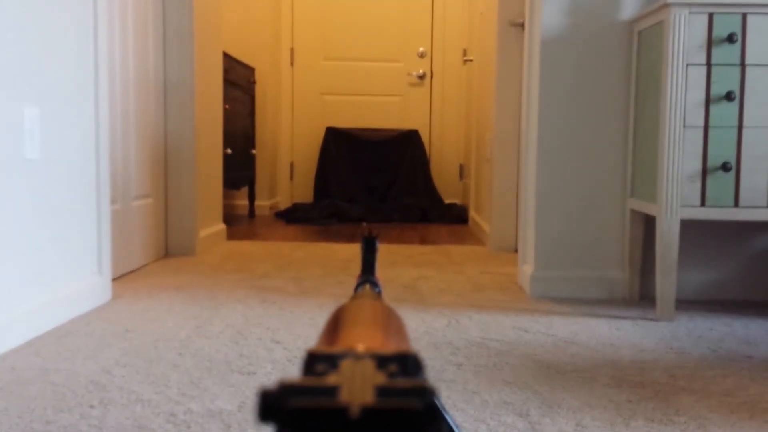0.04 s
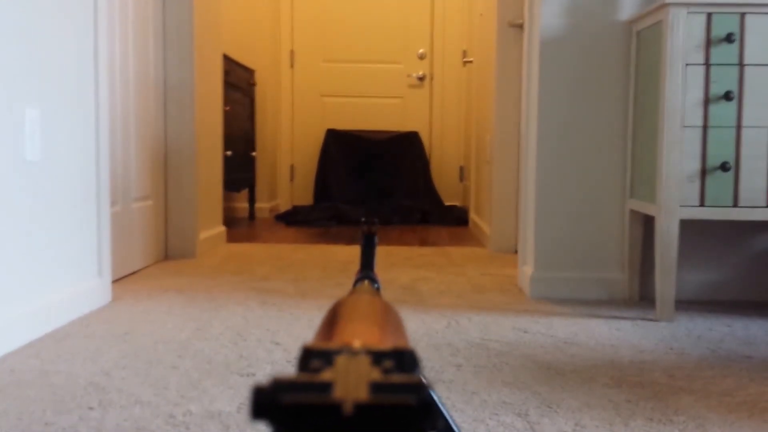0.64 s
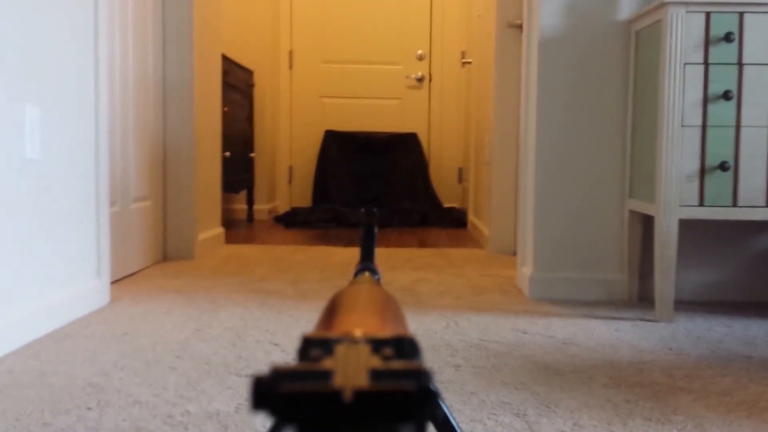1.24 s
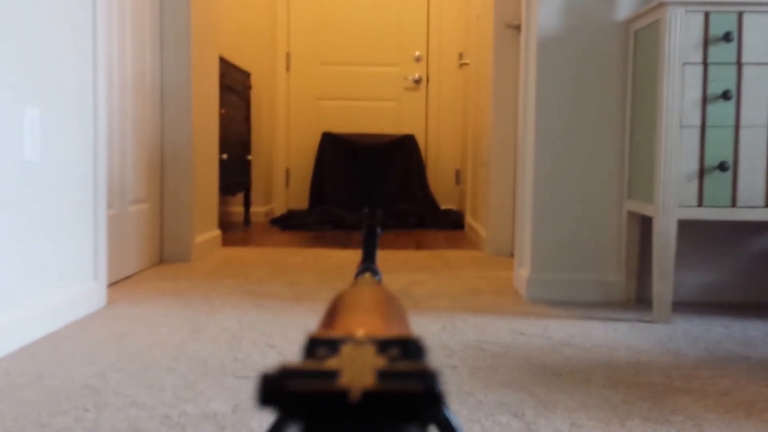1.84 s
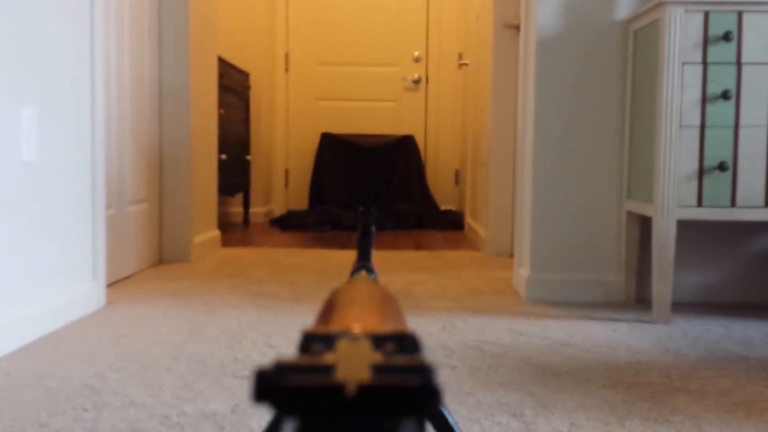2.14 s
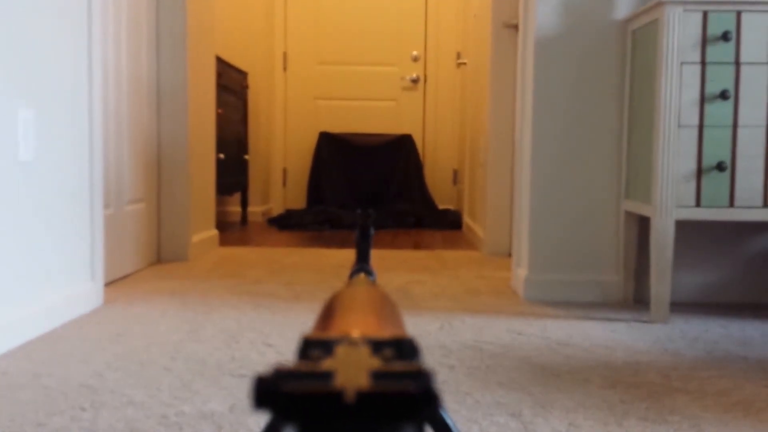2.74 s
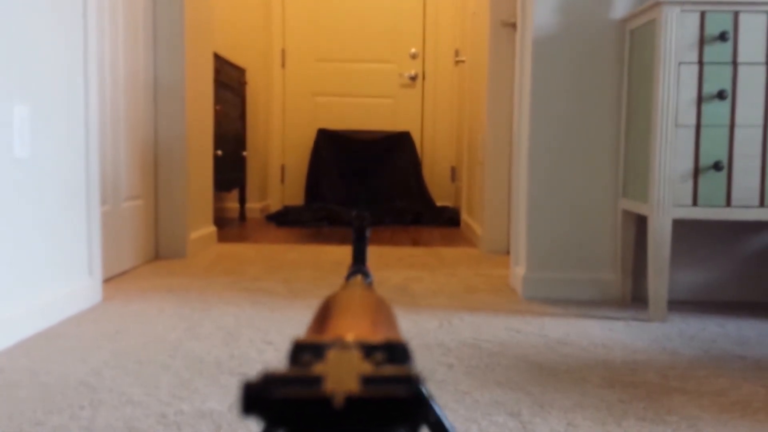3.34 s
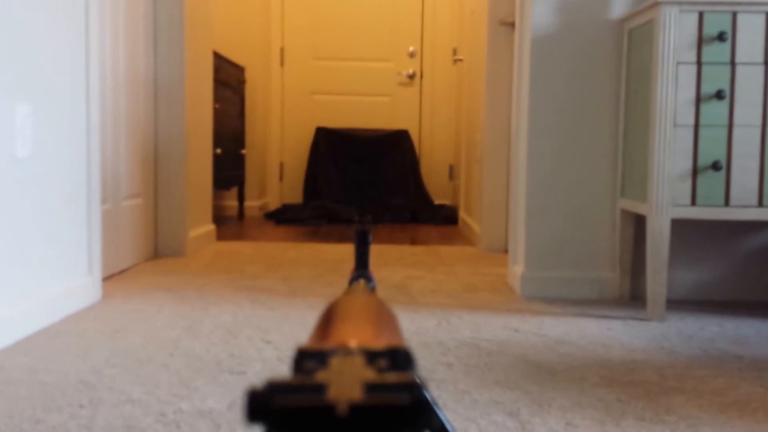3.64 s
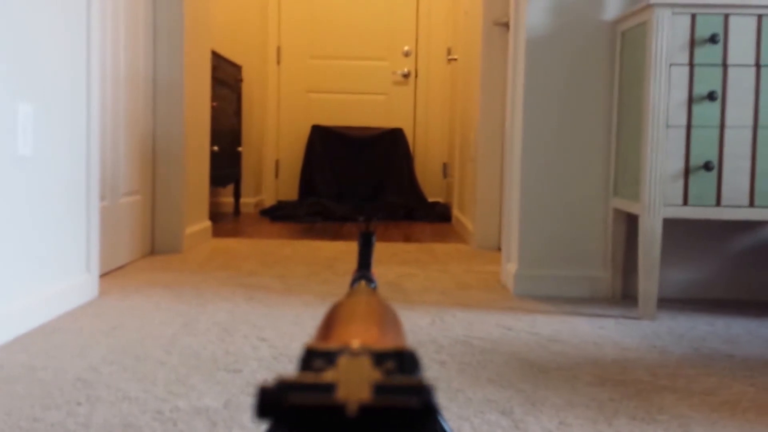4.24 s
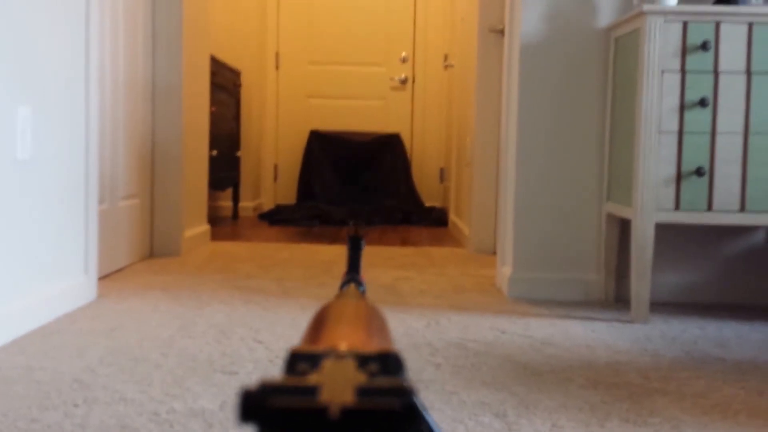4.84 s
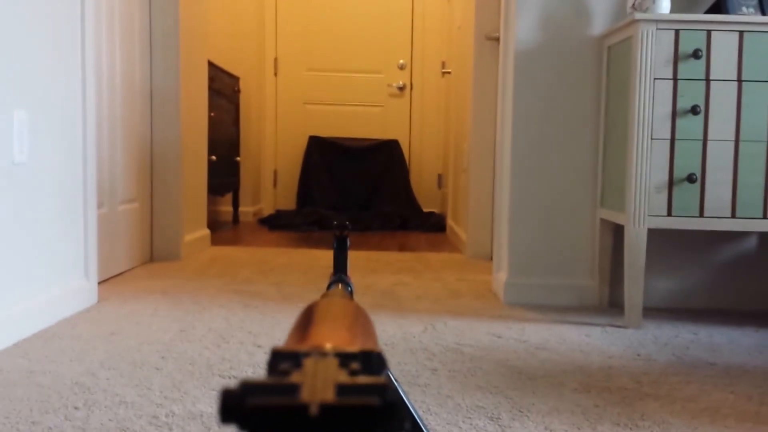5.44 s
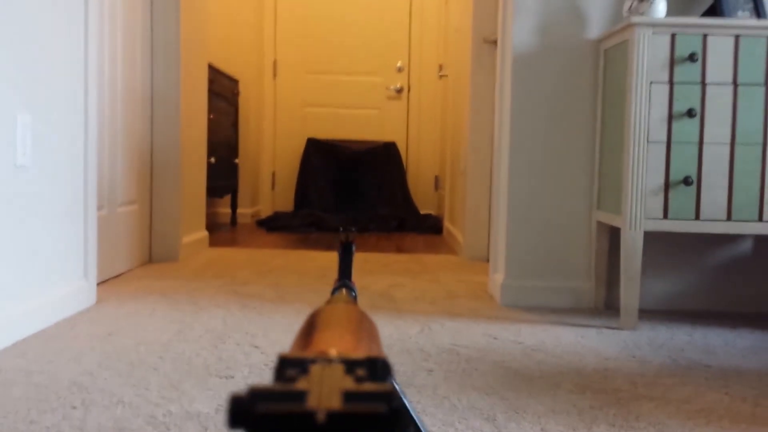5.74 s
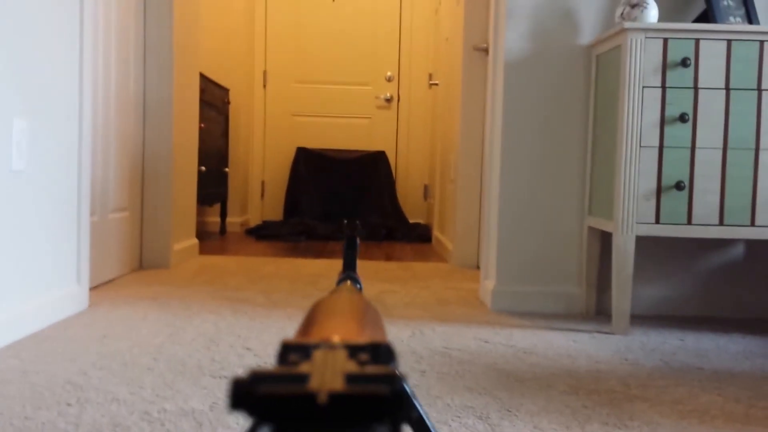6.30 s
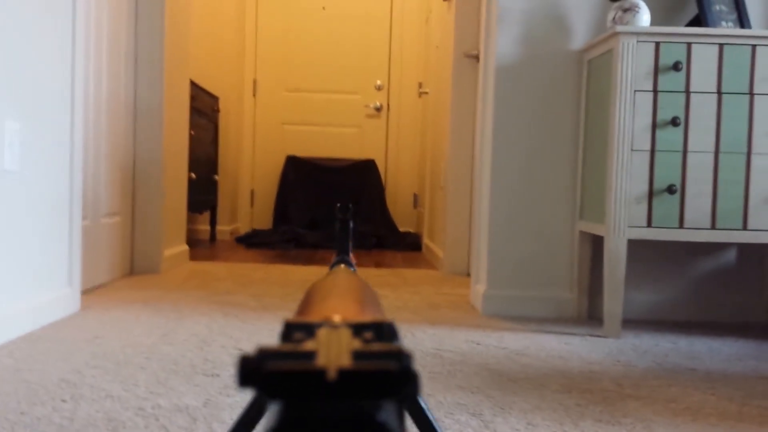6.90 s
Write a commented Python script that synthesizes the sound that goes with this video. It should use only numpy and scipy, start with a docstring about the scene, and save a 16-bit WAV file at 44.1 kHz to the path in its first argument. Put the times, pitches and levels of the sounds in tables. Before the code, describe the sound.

An electric airsoft rifle fires five automatic bursts close to the microphone in a quiet, carpeted hallway. Each begins with a quick rising motor whine, runs as an even rattle of sharp piston slaps, about fourteen a second, with scraping gears and a light thud underneath, then winds down to a small clunk. The first burst lasts from 0.1 to 0.7 seconds, the second from 1.1 to 1.8. A thin plastic tick sounds slightly left at 2.2 seconds. After a faint rub of hands and soft trigger clicks, the longest burst runs from 2.9 to 4 seconds. Two shorter ones follow, from 4.6 to 5.3 and from 5.5 to 6.1 seconds. Faint plastic ticks come at about 6.4 and 7 seconds. The gun sounds fairly dry, with a short hallway echo over very low room tone.

```python
"""An electric airsoft rifle fires five bursts, up close, down a carpeted hallway.
Its motor whines through steel gears, sagging each time it draws the piston back; the piston slips
free, slams into the cylinder head and rocks the gun. The trigger clicks ahead of most bursts, and a
few plastic ticks fall off to the left while the gun rests. Behind it all sit a short hallway echo,
the rub of hands on the stock and quiet room tone."""
import sys
import numpy as np
from scipy import signal
from scipy.fft import rfft, irfft, next_fast_len
from scipy.io import wavfile
from scipy.ndimage import map_coordinates

SR = 44100
rng = np.random.default_rng(int(sys.argv[2]) if len(sys.argv) > 2 else 0)


def digitize_waveform(pressure):
    """Quantize a signal to 16-bit integers and store it at the path in sys.argv[1].

    Rows of a 2-D input are taken as channels; values are limited to [-1, 1].
    """
    field = np.atleast_2d(pressure).T
    bounded = np.clip(field, -1, 1)
    quanta = np.round(bounded * 32767).astype(np.int16)
    wavfile.write(sys.argv[1], SR, quanta)


N = 315823

# Cue sheet, a row per burst: motor start t/s, first slam t/s, shot count, full-speed period/s,
# run-up lag/s, gear stop t/s, first-pull top pitch f/Hz, coast pitch f/Hz, start clunk level/dB
BURSTS = [(.072, .1531, 7, .0710, .0079, .662, 1603, 2380, -16),
          (1.057, 1.1129, 9, .0715, .0119, 1.761, 1200, 1850, -26),
          (2.941, 3.0259, 13, .07157, .0061, 3.957, 1705, 1861, -16),
          (4.636, 4.7233, 8, .07205, .0068, 5.305, 1707, 2259, -21),
          (5.538, 5.6064, 7, .07286, .0095, 6.132, 1380, 3000, -21)]
# First pull of the piston: t/s from motor start, share of top pitch, scrape level/dB, whine level/dB
RUN_UP = [(0, 0.174, -15, -11), (0.008, 0.487, -4, -0.5), (0.024, 0.701, 1.5, -3), (0.036, 0.919, 2, -3),
          (0.058, 0.989, 0, 1), (0.074, .95, -2, -5.5)]
# One turn of the sector gear: share of the turn, nominal pitch f/Hz, scrape level/dB, whine level/dB
GEAR_TURN = [(0, 2703, 1, -28), (.17, 2818, 1, -18), (.21, 2827, 3, -6), (.45, 2713, 2.5, -1),
             (.63, 2552, -0.5, 1.5), (.79, 2328, 1.5, 0.5), (.86, 2236, -5.5, -22.5)]
# Spin-down: share of the time from last shot to stop, scrape level/dB, whine level/dB
COAST = [(.12, -5, -22), (.24, 3.5, -10), (.42, 1.5, -6), (.56, 0, -3), (.7, 1, -4), (.82, -8, -8),
         (.98, -11.5, -17.5)]
# Partials of the whine: multiple of the tooth-mesh pitch, level/dB
WHINE_PARTIALS = [(1, 0.84), (2, -2), (2.35, -10.5), (2.7, -7.5), (3, -3), (4, -5.5)]
WHINE_EQ = [(400, -17), (800, -7.5), (1200, 4), (1620, 5), (2000, -5), (2300, -7.5), (2600, -1.5),
            (2900, -9), (3350, -3), (4200, -4.5), (5450, -2), (6300, 6.5), (7100, 3), (7850, -6.5),
            (8250, -5), (9000, -14), (14000, -21)]  # how well the gun radiates a partial: f/Hz, level/dB
SCRAPE_EQ = [(120, -59), (260, -44.5), (450, -18), (760, -10), (1000, -17), (1400, -4.5), (2000, -10.5),
             (2700, -9.5), (3700, -9), (4700, -8), (5900, -4), (6900, -3), (9000, -10.5), (11500, -17.5),
             (14500, -25)]  # teeth scraping: f/Hz, level/dB

# Hits within a shot: t/s from the slam, crack level/dB, knock level/dB. The rows are release, nozzle,
# air puff, slam, rebound, second rebound, latch, rack pick-up and its bounce.
SHOT_HITS = [(-.0134, -18, -22), (-.0022, -5.5, -11), (-.001, -6.5, -28), (0, -2.5, .3), (.0021, -18, -17),
             (.0062, -16, -21), (.0102, -9.5, -16), (.0146, -10, -11), (.0192, -17, -21)]
HIT_SCATTER = (.0004, 2)  # shot-to-shot spread of the lesser hits: t/s, level/dB
CRACK_EQ = [(150, -48), (400, -27), (1200, -5.5), (2200, -6.5), (4500, -8.5), (7200, 0), (9500, -10),
            (14500, -19.5)]  # bright attack of a hit: f/Hz, level/dB
SHELL_MODES = [(380, -6, 0.011), (778, -3, 0.014), (1020, -3, 0.011), (1310, -2, 0.019),
               (1720, -19.5, .014), (2300, -19.5, 0.0032), (3250, -12.5, 0.012), (4550, -14.5, .007)]  # ring of the gearbox shell: f/Hz, level/dB, t60/s
LATCH_CLUNKS = [(.647, -24), (1.743, -20), (1.754, -15.5), (3.926, -12), (3.947, -14.5), (3.984, -19),
                (3.999, -14.5), (5.292, -20), (5.3, -13.5), (5.33, -14.5), (5.354, -31), (6.119, -14)]  # stopping gears fall back on the latch: t/s, level/dB
RATTLE_EQ = [(200, -36.5), (700, -3.5), (1100, -5), (1350, 2.5), (1700, -1.5), (2200, -10), (4500, -9.5),
             (6800, -6.5), (9500, -17), (14500, -29.5)]  # loose gears: f/Hz, level/dB
THUMPS = [(0.2345, -23.5, 85), (0.394, -27, 84.26), (1.557, -25.5, 84.7), (1.761, -30, 229.1),
          (3.411, -28, 121.6)]  # stray low thumps under the bursts: t/s, level/dB, f/Hz

TRIGGER_CLICKS = [(1.006, -47), (1.02, -45.5), (1.044, -39), (2.877, -45.5), (2.922, -43.5), (4.526, -54.5),
                  (4.62, -44)]  # the finger takes up the trigger: t/s, level/dB
TICKS = [(2.151, -27.5), (2.1655, -25.5), (6.4131, -39.5), (6.458, -40), (6.4672, -36.5), (7.0008, -33.5),
         (7.006, -30)]  # small plastic ticks: t/s, level/dB
TICK_EQ = [(590, -65), (1400, -30.5), (2200, -19.5), (3000, -14.5), (4350, -11), (6500, -7), (9500, -19.5),
           (14900, -37)]  # their thin, bright tone: f/Hz, level/dB
GUN_PAN = [(60, -1.5), (99, -6.5), (160, 1.5), (270, -4.5), (440, -3), (730, -1), (1200, -7.5), (1970, -4),
           (3240, -2), (5340, 3.5), (8790, 0.5), (14500, -11)]  # stereo lean of the gun: f/Hz, left minus right level/dB
GUN_LAG = [(80, .5), (300, 0.15), (700, 1.3), (1400, 1.25), (6000, 1.44)]  # how far left trails right: f/Hz, phase/rad

HALL_DECAY = [(150, 0.42), (400, 0.83), (1000, 0.32), (3000, 0.58), (7000, 0.44), (10000, .45),
              (14000, 0.28)]  # reverb time of the hallway: f/Hz, t60/s
HALL_EQ = [(150, -8), (400, -0.5), (900, 3), (3000, -1.5), (14000, 3)]  # how strongly the hallway answers: f/Hz, level/dB
GRIP_FADER = [(0, -50), (0.068, -50.5), (0.298, -70), (2.4, -82), (2.75, -65.5), (2.92, -58),
              (3.099, -86.5)]  # hands shifting on the stock: t/s, level/dB
ROOM_EQ = [(15, -49), (25, -29.5), (124, -8.5), (146, -16), (181, -2.5), (249, -19.5), (449, -14),
           (542, -21.5), (587, -20), (831, -26), (1000, -28), (1240, -27), (1900, -36), (14900, -45)]  # room tone: f/Hz, level/dB


def gears(whine_db=-18.5, scrape_db=-19.5, chatter_db=1.0):
    """Meshing steel teeth sing a rough, gliding whine and scrape unevenly, once per tooth."""
    hz, scrape_gain, whine_gain = motor()
    wavering_hz = hz * (1 + .009 * wobble(150) + .008 * wobble(20))
    phase = 2 * np.pi * np.cumsum(wavering_hz) / SR + .18 * wobble(1200)
    # upper partials leave the gun by many paths, so their phase drifts apart left and right
    paths = np.array([wobble(60), wobble(60)])
    whine = 0
    for k, db in WHINE_PARTIALS:
        gain = amp(db + curve(WHINE_EQ, k * hz) + 2.2 * wobble(250))
        smear = (k - 1) * paths + min(k - 1, .65) * wobble(600)
        whine += gain * np.sin(k * phase + smear)
    teeth = (1 + .5 * np.cos(phase)) * amp(1.5 * wobble(700) + chatter_db * wobble(110))
    scrape = noise(SCRAPE_EQ, 350, scrape_gain * teeth)
    return amp(whine_db) * whine_gain * whine + amp(scrape_db) * scrape


def motor(nominal_turn_s=.072, sag=.35, release_s=.012, effort_db=7, momentum_db=8):
    """Automation for pitch, scrape gain and whine gain: the motor runs up, sags per shot and coasts."""
    keys = []  # t/s, f/Hz, scrape level/dB, whine level/dB
    for start, *firing, stop, pull_hz, coast_hz, _ in BURSTS:
        shots = slam_times(*firing)
        first, last = shots[0], shots[-1]
        keys.append((start - .002, 0, -90, -90))
        pull_db = effort_db * np.log2(pull_hz / BURSTS[0][6])  # a faster first pull scrapes harder
        keys += [(start + age, share * pull_hz, scrape + pull_db, whine)
                 for age, share, scrape, whine in RUN_UP if start + age < first - release_s]
        keys += [(first - release_s, .95 * pull_hz, -3, -1), (first - .008, pull_hz, -12, -20)]
        for shot, gap in zip(shots, np.diff(shots)):
            bend = (nominal_turn_s / gap) ** sag  # a slower turn sits lower
            keys += [(shot + share * gap, hz * bend, *levels) for share, hz, *levels in GEAR_TURN]
        # current off: the spring brakes ever harder; fast gears still sing, slow ones only grind
        keys.append((last, coast_hz, *GEAR_TURN[0][2:]))
        spin_db = momentum_db * np.log2(coast_hz / GEAR_TURN[0][1])
        for share, scrape, whine in COAST:
            falling_hz = coast_hz * (1 - share ** 2)
            keys.append((last + share * (stop - last), falling_hz, scrape + spin_db / 2, whine + spin_db))
        keys.append((stop + .02589, 0, -90, -90))
    s, hz, scrape_db, whine_db = np.transpose(sorted(keys))
    t = np.arange(N) / SR
    return np.interp(t, s, hz), amp(np.interp(t, s, scrape_db)), amp(np.interp(t, s, whine_db))


def slam_times(first, count, period, lag, settle=.1):
    """The rhythm of a burst: even, but for a longer first gap while the motor gains speed."""
    k = np.arange(round(count))
    return first + k * period + lag * (1 - settle ** k)


def piston(shots, knock_db=10, crack_db=8.0):
    """Each shot is one firm slam among looser hits: a bright crack layered on a knock of the shell."""
    cracks, knocks = [], []
    for s, db in shots:
        for delay, sharp_db, dull_db in SHOT_HITS:
            late, louder = rng.standard_normal(2) * (delay != 0) * HIT_SCATTER
            cracks.append((s + delay + late, db + sharp_db + louder))
            knocks.append((s + delay + late, db + dull_db + louder))
    crack = noise(CRACK_EQ, 2000, strike(cracks, decay(.011)))
    return amp(crack_db) * crack + amp(knock_db) * shell_knock(knocks)


def shell_knock(hits, low_cut_hz=270):
    """Hits ring the gearbox shell, too small to carry bass; neighbouring modes swing opposite ways."""
    t = np.arange(SR // 10) / SR
    ring = sum((-1) ** k * amp(db) * decay(t60) * np.sin(2 * np.pi * hz * t)
               for k, (hz, db, t60) in enumerate(SHELL_MODES))
    return strike(hits, low_cut(ring, low_cut_hz))


def gear_clunks(rattle_db=-3, knock_db=-5):
    """The gears clunk and rattle as they take up their play, and again as they drop onto the latch."""
    clunks = [(start, db) for start, *_, db in BURSTS] + LATCH_CLUNKS
    rattle = noise(RATTLE_EQ, 2200, strike(clunks, decay(.074, rise_s=.0044)))
    return amp(rattle_db) * rattle + amp(knock_db) * shell_knock(clunks)


def recoil(shots, rock_hz=122, rock_db=-12, release_hz=290, release_db=-19, shudder_db=-23):
    """The low end: the piston lets go with a thud, shoves the gun back and leaves it shuddering."""
    lead_s, shudder_s = .006, .011  # the shove peaks just ahead of the slam
    t = np.arange(-SR // 20, SR // 20) / SR
    push = lambda hz: -np.cos(2 * np.pi * hz * t) * np.exp(-(hz * t / .7) ** 2)
    cues = lambda offset, trim_db: [(s + offset + t[0], db + trim_db) for s, db in shots]
    thud = strike(cues(SHOT_HITS[0][0], release_db), push(release_hz))
    rocking = strike(cues(-lead_s, rock_db), push(rock_hz))
    swell = strike(cues(-lead_s, shudder_db), np.exp(-(t / shudder_s) ** 2))
    shudder = noise([(30, -9), (110, -7.5), (250, -6), (600, -36.5), (2000, -79)], 12, swell)
    thumps = sum(strike([(s + t[0], db)], push(hz)) for s, db, hz in THUMPS)
    return thud + rocking + shudder + thumps


def trigger(rattle_db=-5, knock_db=-3):
    """The finger takes up the trigger: a dull click with a little of the shell in it."""
    rattle = noise(RATTLE_EQ, 2000, strike(TRIGGER_CLICKS, decay(.12)))
    return amp(rattle_db) * rattle + amp(knock_db) * shell_knock(TRIGGER_CLICKS)


def place_gun(x):
    """The close gun reaches the left slightly late, and each side with its own colour."""
    side = np.array([[.5], [-.5]])
    return filtered(x, lambda hz: amp(side * curve(GUN_PAN, hz)) * np.exp(-1j * side * curve(GUN_LAG, hz)))


def plastic_ticks(level_db=-4, left_db=4):
    """Bright, very short ticks of plastic, panned a little left."""
    pan = amp(left_db * np.array([[.5], [-.5]]))
    return amp(level_db) * pan * noise(TICK_EQ, 370, strike(TICKS, decay(.013)))


def hallway(send, predelay_s=.006):
    """Walls and doors answer after a short gap; each frequency dies at its own speed."""
    hz, t, bands = signal.stft(rng.standard_normal((2, SR * 2 // 3)), SR, nperseg=256)
    tail = signal.istft(bands * amp(-60 * t / curve(HALL_DECAY, hz)[:, None]), SR, nperseg=256)[1]
    tail = np.pad(tail / np.linalg.norm(tail[0]), ((0, 0), (round(predelay_s * SR), 0)))
    wet = signal.fftconvolve(send, tail, axes=1)[:, :N]
    return filtered(wet, lambda hz: amp(curve(HALL_EQ, hz)))


def hand_rub():
    """Hands shift on the stock with a soft, dark rub."""
    fader = amp(np.interp(np.arange(N) / SR, *np.transpose(GRIP_FADER)))
    return fader * noise([(60, -6), (200, -4.5), (600, -9.5), (2000, -26.5), (14000, -37.5)], 480)


def room_tone(level_db=-63):
    """The quiet of the house: a steady, low bed of air."""
    return amp(level_db) * noise(ROOM_EQ, split_hz=1400)


def amp(db):
    """Decibels to gain."""
    return 10 ** (np.asarray(db) / 20)


def curve(points, hz):
    """Read (f/Hz, value) breakpoints on a log frequency axis."""
    f, value = np.transpose(points)
    return np.interp(np.log(hz + 1), np.log(f + 1), value)


def wobble(rate):
    """A smooth random modulator, rate knots a second."""
    knots = rng.standard_normal(int(N * rate / SR) + 4)
    return map_coordinates(knots, [np.arange(N) * rate / SR], order=2)


def decay(t60, rise_s=.00008):
    """A percussive envelope: quick attack, exponential fall."""
    t = np.arange(SR // 10) / SR
    return amp(-60 * t / t60) * (1 - np.exp(-t / rise_s))


def strike(cues, shape):
    """Lay one copy of shape at each (t/s, level/dB) cue."""
    s, db = np.transpose(cues)
    impulses = np.bincount(np.round(s * SR).astype(int), amp(db), N)[:N]
    return signal.oaconvolve(impulses, shape)[:N]


def filtered(x, response):
    """Pass x through a complex frequency response."""
    size = next_fast_len(N + 8192)
    return irfft(rfft(x, size) * response(np.fft.rfftfreq(size, 1 / SR)), size)[..., :N]


def low_cut(x, hz):
    """Roll off the bass at 12 dB an octave."""
    return signal.sosfilt(signal.butter(2, hz, "high", fs=SR, output="sos"), x)


def noise(eq, split_hz, envelope=1):
    """Stereo noise shaped by envelope, then by eq: centred below split_hz, wide above."""
    colour = lambda hz: amp(curve(eq, hz)) * np.array([np.ones_like(hz), hz / (hz + split_hz)])
    mid, side = filtered(envelope * rng.standard_normal((2, N)), colour)
    return np.array([mid + side, mid - side]) / np.sqrt(2 * np.mean(colour(np.arange(SR // 2)) ** 2))


def scene(slam_db=-15.5, gun_send_db=-12):
    """The mix: the gun close and fairly dry, the ticks further off and wetter, the house underneath."""
    shots = [(s, slam_db) for burst in BURSTS for s in slam_times(*burst[1:5])]
    ticks = plastic_ticks()
    gun = trigger() + gears() + piston(shots) + gear_clunks()
    echo = hallway(amp(gun_send_db) * gun + ticks)
    return place_gun(gun + recoil(shots)) + ticks + echo + room_tone() + hand_rub()


def record(dry, low_cut_hz=45, high_cut_hz=14700):
    """The master chain: trim the deep bass, round off the loudest peaks, cut the top steeply."""
    trimmed = low_cut(dry, low_cut_hz)
    rounded = trimmed / (1 + np.abs(trimmed) ** 6) ** (1 / 6)
    return filtered(rounded, lambda hz: 1 / (1 + (hz / high_cut_hz) ** 160))


dry = scene()
out = record(dry)
digitize_waveform(out)
```